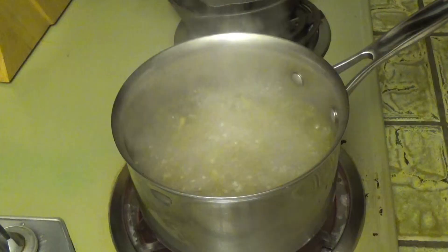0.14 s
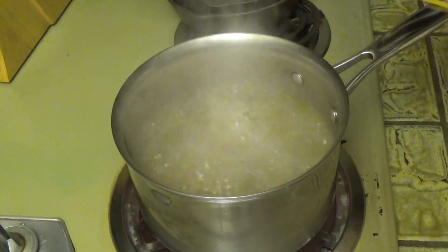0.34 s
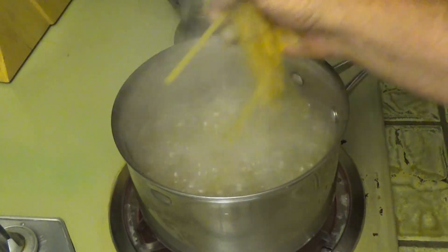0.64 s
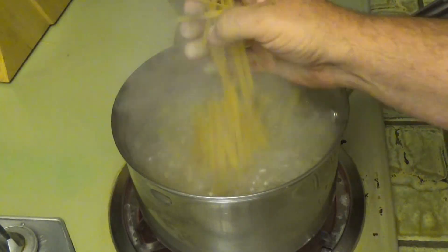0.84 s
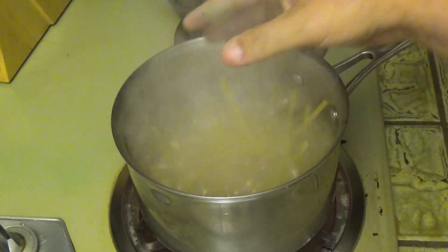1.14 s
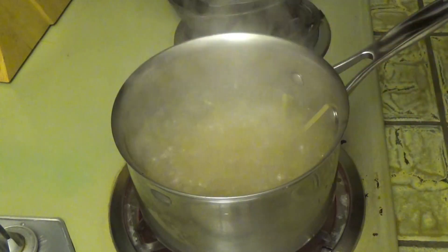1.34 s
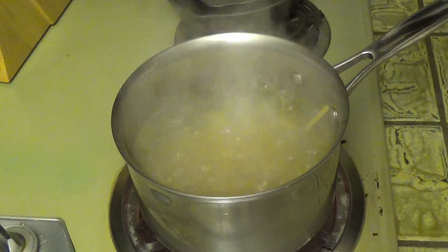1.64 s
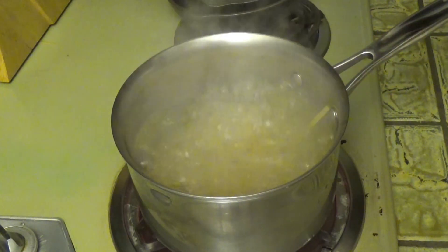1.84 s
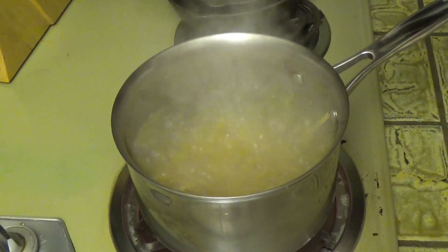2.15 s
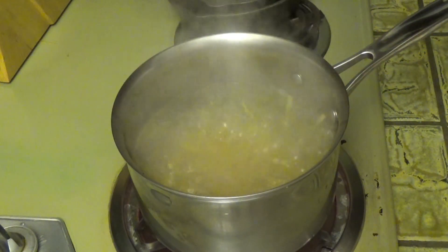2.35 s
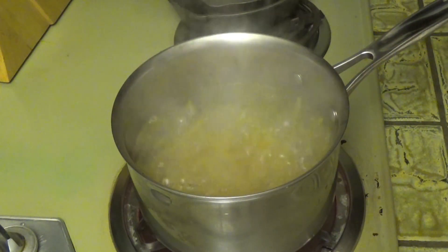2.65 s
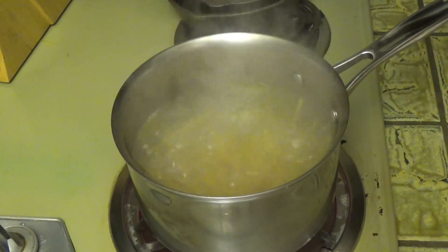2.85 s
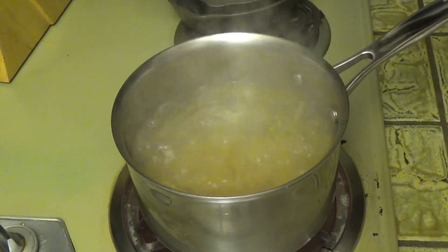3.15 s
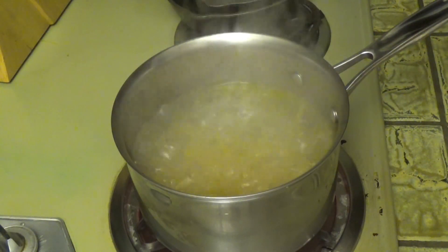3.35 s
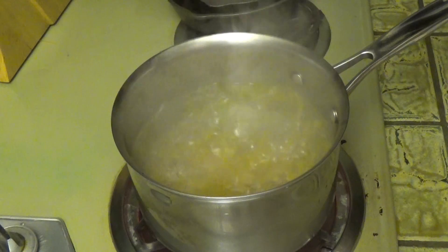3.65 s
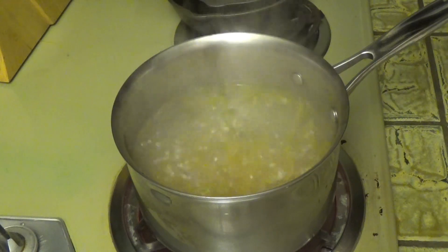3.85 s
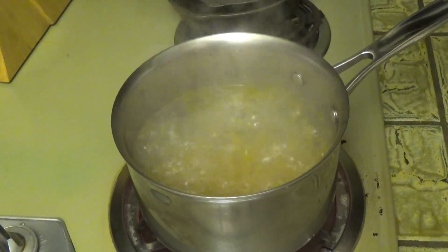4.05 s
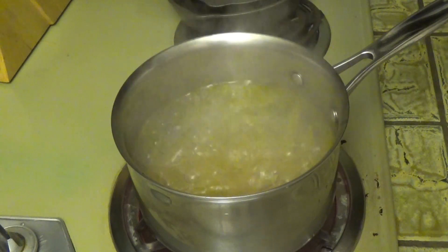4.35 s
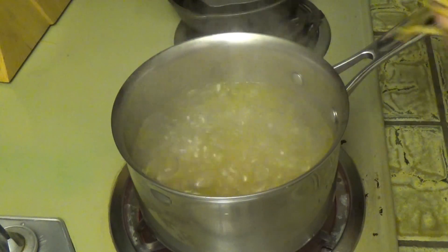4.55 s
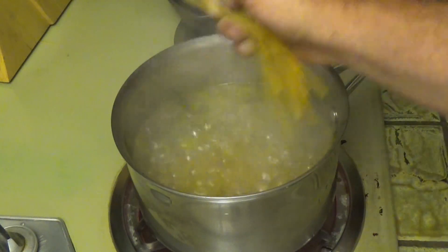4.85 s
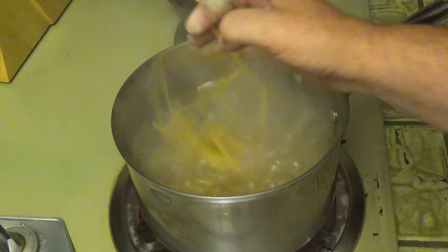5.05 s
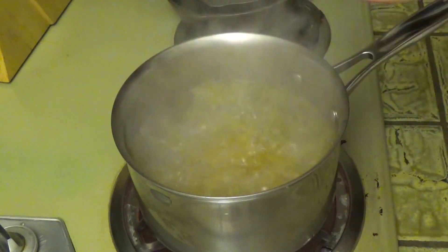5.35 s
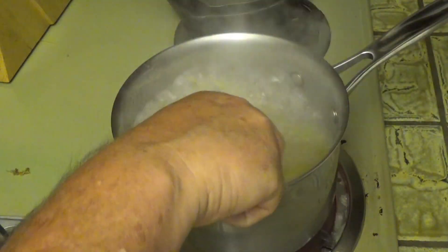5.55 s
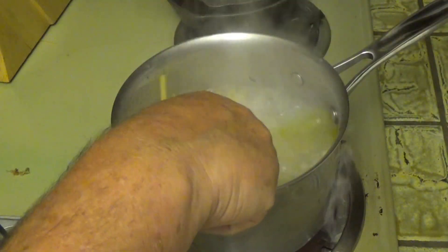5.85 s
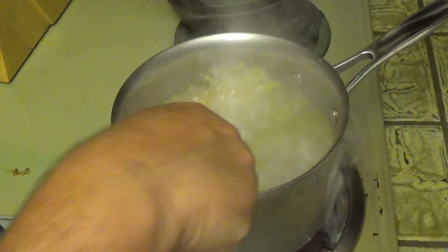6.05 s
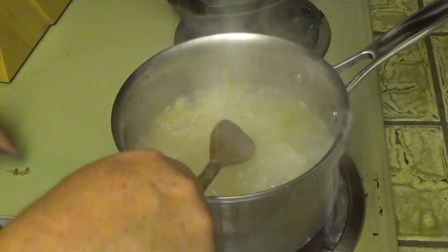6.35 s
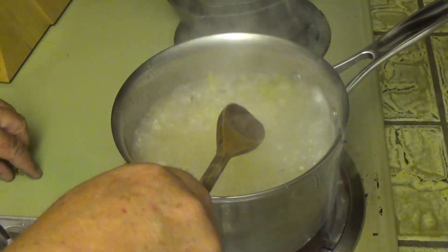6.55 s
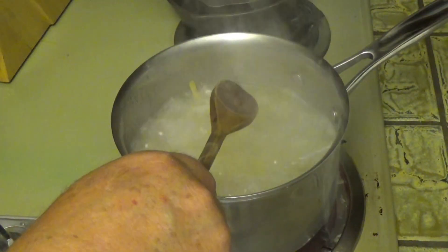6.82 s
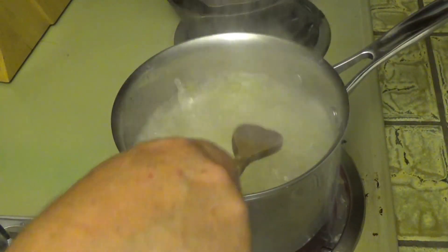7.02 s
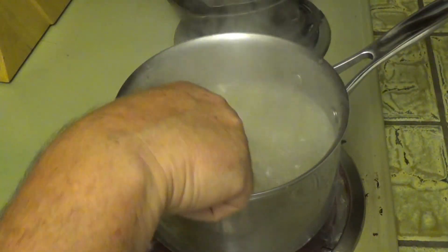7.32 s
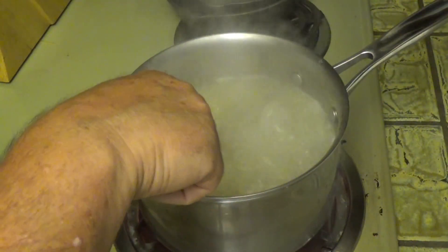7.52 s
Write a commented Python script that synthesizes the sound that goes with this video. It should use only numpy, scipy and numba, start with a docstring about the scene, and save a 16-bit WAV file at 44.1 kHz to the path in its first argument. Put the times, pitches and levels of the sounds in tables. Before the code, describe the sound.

Dry pasta clatters on china and slides into bubbling water, followed by a bright sizzle and a wooden spoon knocking the pot.

```python
"""Pasta into a boiling pot

A close stereo microphone at the hob of a tiled kitchen, where water boils in a steel pot. To the right,
dry pasta is gathered off a plate, rattling on the china, and two handfuls slide into the water.
Then spilt water sizzles on the hot ring while a wooden spoon bumps the pot."""
import sys
import numpy as np
from scipy import signal
from scipy.fft import rfft, irfft
from scipy.io import wavfile
from scipy.ndimage import uniform_filter1d
from numba import njit

SR = 44100
rng = np.random.default_rng(int(sys.argv[2]) if len(sys.argv) > 2 else 0)


def generate_wav(signal):
    """Clip the signal to [-1, 1] and save it as 16-bit WAV at the path in sys.argv[1]."""
    frames = np.transpose(np.atleast_2d(signal))
    scaled = np.clip(frames, -1, 1) * 32767
    pcm = np.round(scaled).astype(np.int16)
    wavfile.write(sys.argv[1], SR, pcm)


N = 338688


def undb(db):
    return 10 ** (np.asarray(db) / 20)


def unit(x):
    return x / np.sqrt(np.mean(x ** 2))


def curve(table, column=1):
    """One column of a table at every sample; the end values are held."""
    rows = np.array(table)
    return np.interp(np.arange(N) / SR, rows[:, 0], rows[:, column])


def colour(x, points):
    """Causal filter that follows (Hz, dB) points; rms 1."""
    hz, db = np.transpose(points)
    log_gain = np.interp(np.log(np.arange(1025) * SR / 2048 + 1), np.log(hz), db) * np.log(10) / 20
    cepstrum = irfft(log_gain)
    cepstrum[1:1024] *= 2  # fold to minimum phase
    cepstrum[1025:] = 0
    return unit(signal.fftconvolve(x, irfft(np.exp(rfft(cepstrum))))[:N])


def band(x, lo_hz, hi_hz):
    sos = signal.butter(2, [lo_hz, min(hi_hz, .45 * SR)], "band", fs=SR, output="sos")
    return signal.sosfilt(sos, x)


def tilt(x, hz, db):
    """Lift or cut what lies below hz."""
    return x + (undb(db) - 1) * signal.lfilter(*signal.butter(2, hz, fs=SR), x)


def ring(x, modes):
    """Damped resonances struck by x."""
    out = 0
    for hz, db, t60 in modes:
        pole = np.exp(2j * np.pi * hz / SR - np.log(1000) / (t60 * SR))
        out = out + undb(db) * signal.lfilter([1], [1, -pole], x).imag
    return out


@njit
def chirps(n, starts, steps, glide, fade, size):
    """Sum of decaying sines whose pitch can climb."""
    out = np.zeros(n)
    for g in range(len(starts)):
        phase, step, amp, i = 0., steps[g], size[g], starts[g]
        while amp > .004 * size[g] and i < n:
            out[i] += amp * np.sin(phase)
            phase += step
            step = min(step * glide[g], 3.)
            amp *= fade[g]
            i += 1
    return out


def grains(rate, lo_hz, hi_hz, cycles, spread_db, rise=0.):
    """Short random pings, rate a second, a few much larger than the rest; rms 1."""
    when, pitch, rank = rng.random((int(rate * N / SR), 3)).T
    starts = (when * N).astype(np.int64)
    hz = lo_hz * (hi_hz / lo_hz) ** pitch
    span = cycles * SR / hz
    size = hz * undb(-spread_db * np.log(1 - .999 * rank))
    return unit(chirps(N, starts, 2 * np.pi * hz / SR, (1 + rise) ** (1 / span), np.exp(-1 / span), size))


def flicker(rate):
    """Random levels held 1 / rate s and smoothed twice; spread near 1."""
    hold = int(SR / rate)
    levels = np.repeat(rng.standard_normal(N // hold + 1), hold)
    return 1.63 * uniform_filter1d(uniform_filter1d(levels, hold), hold)[:N]


def burst(t60, lo_hz, hi_hz):
    """A short decaying puff of noise, peak 1."""
    t = np.arange(int(t60 * SR) + 64) / SR
    x = band(rng.standard_normal(len(t)) * 1000. ** (-t / t60), lo_hz, hi_hz)
    return x / np.abs(x).max()


def bell(t, rise, fall):
    """Lopsided bell curve, 1 at t = 0."""
    return np.exp(-.5 * (t / np.where(t < 0, rise, fall)) ** 2)


def add(out, start, x):
    i = int(start * SR)
    out[..., i:i + x.shape[-1]] += x[..., :N - i]


def pan(x, left_db):
    return x * undb(np.array([[left_db], [-left_db]]) / 2)


# The rolling boil. Each row: time in seconds, gurgle level, rumble lift and fizz level, all in dB.
BOIL_LEVELS = [(0, -47, -10, -38), (.6, -44, -2, -34), (1.4, -44.5, 4, -37), (4.2, -45, 1, -38),
               (5.6, -45.5, 6.5, -37.5), (7.68, -42, 8.5, -34)]
# Tone of the gurgle and of the fizz. Each row: frequency in Hz, relative level in dB.
GURGLE_SPECTRUM = [(20, -44), (85, -20.5), (105, -12), (190, -15), (270, -3.5), (420, -5.5), (500, 1),
                   (650, -5), (800, -0.5), (1050, -2), (1500, -11), (2500, -16)]
FIZZ_SPECTRUM = [(150, -40), (600, -21), (1200, -8), (2200, -6.5), (4100, -3), (7500, -8), (9600, -6.5),
                 (12500, -13), (16000, -26)]
# The steel pot's resonances. Each row: frequency in Hz, gain in dB, seconds to fall 60 dB.
POT_MODES = [(287.8, -8, 0.65), (490, -6.5, 0.1), (831.6, -1.5, 0.15), (1053, 1.5, 0.064),
             (1380, -27, 0.099), (1625, 2, 0.085)]
def boil():
    """Straight ahead, bubbles gurgle through the pot's resonances; small ones fizz at the surface."""
    bubbles = grains(400, 150.7, 2525, cycles=5.46, spread_db=1.5, rise=0.058)
    gurgle = colour(bubbles + undb(8.5) * rng.standard_normal(N), GURGLE_SPECTRUM)
    steel = unit(band(ring(gurgle, POT_MODES), 136, 3900))
    gurgle = tilt(unit(gurgle + undb(-12) * steel), 140, curve(BOIL_LEVELS, column=2))
    beads = grains(700, 6260, 19000, cycles=2, spread_db=3)
    fizz = colour(beads + undb(4.5) * rng.standard_normal(N), FIZZ_SPECTRUM)
    fizz_db = curve(BOIL_LEVELS, column=3) + .6 * flicker(40)
    return undb(curve(BOIL_LEVELS)) * gurgle + undb(fizz_db) * fizz


# The hand sweeping through the pasta. Each row: start in seconds, level in dB,
# hold and release in seconds, lift of the duller contacts in dB.
HAND_SWEEPS = [(0.289, -24.5, .02, 0.065, 1), (0.383, -28.5, 0.043, 0.13, 3),
               (1.76, -17.5, 0.092, 0.26, -0.4), (2.152, -22.5, 0.023, 0.054, -4),
               (2.191, -17, 0.054, 0.15, -2.5), (2.453, -20.5, 0.041, 0.041, 1),
               (2.512, -18, 0.035, 0.27, -.6), (2.74, -26, 0.014, 0.2, 0.7),
               (2.872, -28.5, 0.1, 0.084, -3.5), (2.966, -24, 0.029, 0.33, -3.5),
               (3.175, -19, 0.032, 0.11, -1), (3.293, -18.5, 0.075, 0.082, -0.5),
               (3.458, -21.5, 0.049, 0.16, 1), (3.591, -19.5, 0.12, 0.25, 1.6),
               (3.966, -27.5, 0.029, .05, 1), (4.02, -24.5, 0.038, 0.13, 3.2),
               (4.305, -36.5, .01, 0.11, 3.5), (4.385, -27.5, .01, 0.11, 0), (4.453, -27.5, 0.015, 0.07, 1)]
def hand_sweeps(attack_s=0.036, taper=0.89):
    """Strength and dullness of sweeps that swell, hold and settle; the loudest sets the colour."""
    t, power, dull = np.arange(N) / SR, 1e-12, 0
    for start, db, hold, release, dull_db in HAND_SWEEPS:
        swell = np.clip((t - start) / attack_s, 0, 1)
        settle = np.clip(1 - (t - start - attack_s - hold) / release, 0, 1)
        sweep_power = (undb(db) * swell ** 2 * settle ** taper) ** 2
        power += sweep_power
        dull += sweep_power * dull_db
    return np.sqrt(power), dull / power


# Tone of dry pasta on china. Each row: frequency in Hz, relative level in dB.
PLATE_SPECTRUM = [(40, -47), (300, -27), (800, -18.5), (1100, -11), (1700, -1.5), (2900, 1.5), (4000, -2.5),
                  (6000, -6.5), (10000, -12), (13000, -23), (16000, -37)]
# The plate's resonances. Each row: frequency in Hz, gain in dB, seconds to fall 60 dB.
PLATE_MODES = [(1240, 8, 0.18), (1738, 10, 0.22), (2196, 9, 0.045), (2366, -9, 0.042), (2744, 11, 0.053),
               (3025, 13, 0.067), (3470, 4, 0.074), (4030, -22, 0.087)]
# A bunch of sticks slapping the china at once. Each row: start in seconds, peak level in dB.
CLACKS = [(0.3188, -6), (0.3995, -9.5), (0.413, -9), (0.471, -9), (2.1685, -10), (2.4863, -7),
          (2.7756, -9.5), (2.8389, -13), (3.4055, -12), (3.4663, -8), (3.9624, -19), (4.0284, -7),
          (4.0624, -8), (4.143, -9.5), (4.214, -15), (4.3256, -15.5), (4.3975, -7.5)]
def plate_rattle():
    """Right of the microphone, hundreds of hard sticks knock together in clumps and ring the china."""
    clicks = unit(grains(6000, 293, 19100, cycles=11, spread_db=1) + undb(3.5) * rng.standard_normal(N))
    snaps = grains(250, 1070, 13500, cycles=6, spread_db=3)  # lone sticks flicking free
    clicks = (clicks + undb(-9.5) * snaps) * undb(1.04 * flicker(90))
    strength, dull_db = hand_sweeps()
    clicks = tilt(clicks, 4700, dull_db + 0.39 * flicker(14))  # contacts shift from dull to bright
    china = unit(band(ring(clicks, PLATE_MODES), 640, 9100))
    out = strength * unit(colour(clicks, PLATE_SPECTRUM) + undb(-16) * china)
    for start, db in CLACKS:
        clack = colour(burst(0.069, 1440, 19000), PLATE_SPECTRUM)
        clack += undb(-8.5) * unit(band(ring(clack, PLATE_MODES), 2200, 11000))
        add(out, start, undb(db) * clack / np.abs(clack).max())
    return out


# Spits at the hob. Each row: start in seconds, peak level in dB, pitch in Hz.
SPITS = [(0.5499, -29, 8300), (0.7701, -22, 9550), (0.7997, -14, 9570), (0.893, -12, 10200),
         (0.9492, -15, 5460), (2.051, -34.5, 6840), (2.1186, -12, 7795), (4.5788, -27, 9570),
         (4.62, -25, 9200), (4.8603, -18, 9500), (4.9294, -31, 5490), (5.1044, -11.5, 9450),
         (5.1482, -14, 8900), (5.23, -18, 5300), (5.2734, -23, 9820), (5.3827, -31.5, 9320),
         (5.456, -15, 5150), (5.5175, -29, 5580), (7.3826, -17, 12200)]
def spits():
    """Thin, high spits, each an instant of narrow treble noise."""
    out = np.zeros(N)
    for start, db, hz in SPITS:
        add(out, start, undb(db) * burst(0.01, hz / 1.02, hz * 1.09))
    return out


# Taps on the pot. Each row: start in seconds, level in dB, pitch in Hz, relative treble in dB.
STEEL_TICKS = [(0.8837, -20, 1680, 6), (0.9447, -18, 2840, -11), (1.1723, -28.5, 1560, 10),
               (1.2192, -25.5, 4100, 6), (1.2282, -31, 3770, 9), (5.025, -27.5, 2830, 15),
               (5.066, -24, 3720, -6), (5.1053, -26, 2800, -7), (5.145, -26, 1660, -1),
               (5.2005, -23.5, 2750, -8), (5.227, -22, 3560, 9), (5.425, -28.5, 4040, -13),
               (5.4566, -21.5, 2510, 10), (5.467, -21.5, 4230, -9), (5.655, -24, 3200, 10),
               (6.957, -17, 2950, -19), (7.1058, -30, 1590, -6), (7.1456, -23, 4200, -7),
               (7.537, -27.5, 3100, -7.5)]
def steel_ticks(t60=0.071):
    """Single sticks and the spoon tick on the steel, ringing briefly under a bright crack."""
    out = np.zeros(N)
    for start, db, hz, treble_db in STEEL_TICKS:
        note = burst(t60, hz / 1.09, hz * 1.06)
        body = burst(t60, hz / 2.1, hz * 2.3)
        add(out, start, undb(db) * (note + undb(3.5) * body))
        add(out, start, undb(db + treble_db) * burst(0.42 * t60, 7000, 13000))
    return out


# Bumps and plops. Each row: start in seconds, level in dB, starting pitch in Hz.
POT_BUMPS = [(0.943, -20.5, 1040), (1.017, -24, 850), (1.054, -27, 1390), (1.102, -32.5, 1010),
             (2.273, -27, 776), (2.651, -28, 790), (5.071, -29, 1010), (5.159, -24.5, 1050),
             (5.626, -25, 863), (6.053, -31.5, 830), (6.845, -36, 785), (6.984, -31, 1050),
             (7.024, -33, 950), (7.106, -32, 846), (7.183, -23, 1050), (7.359, -27, 1060),
             (7.371, -25.5, 900), (7.459, -33, 826), (7.523, -35, 785), (7.546, -29.5, 860),
             (7.601, -22.5, 740)]
def pot_bumps():
    """Dull bumps and large bursting bubbles set the pot ringing."""
    blows, t = np.zeros(N), np.arange(SR // 10) / SR
    envelope = 1000. ** (-t / 0.041) * (1 - np.exp(-t / 0.00084))
    for start, db, hz in POT_BUMPS:
        note = np.sin(2 * np.pi * hz * t * (1 + 3.3 * t))  # climbs as the bubble nears the surface
        splash = undb(-3.5) * unit(band(rng.standard_normal(len(t)), hz / 1.88, hz * 1.77))
        add(blows, start, undb(db) * envelope * (note + splash))
    return band(blows + undb(-41.5) * ring(blows, POT_MODES), 200, 4000)


# Tone of sliding pasta. Each row: frequency in Hz, relative level in dB.
RUSTLE_SPECTRUM = [(200, -62), (1000, -14), (2300, -6.5), (3500, 1), (7000, 0), (10000, 1.5), (13000, -4),
                   (16000, -18)]
# Two handfuls let go over the pot, the second led by a few loose sticks. Each row: landing time in
# seconds, level in dB, relative splash in dB, seconds of slide before, seconds of stragglers after.
HANDFULS = [(0.954, -24.5, -6, 0.11, 0.28), (4.93, -42, -20, 0.046, .03), (5.155, -24.5, -8, 0.11, 0.11)]
def pasta_drops(stop_s=0.022, straggle_db=-15.5):
    """Sticks rustle past the fingers ever thicker until the bulk splashes in; stragglers follow."""
    sticks = grains(6000, 674, 19100, cycles=3.9, spread_db=3.5) + undb(-1.5) * rng.standard_normal(N)
    rustle = colour(sticks, RUSTLE_SPECTRUM) * undb(1.04 * flicker(80))
    splash = unit(band(grains(1500, 754, 2936, cycles=8.8, spread_db=3.5, rise=0.039), 550, 1950))
    out = 0
    for landing, db, splash_db, slide, straggle in HANDFULS:
        t = np.arange(N) / SR - landing
        held = np.minimum(t, 0) + np.maximum(t - straggle, 0)  # stays at 0 while stragglers fall
        stragglers = undb(straggle_db) * bell(held, slide, stop_s)
        falling = bell(t, slide, stop_s) + stragglers
        wet = undb(splash_db) * (bell(t, rise=0.068, fall=0.045) + stragglers)
        out += undb(db) * (falling * rustle + wet * splash)
    return out


# Spilt water on the hot ring. Each row: time in seconds, level in dB before the low hiss is lifted.
SIZZLE_LEVELS = [(5.654, -20.5), (5.9, -21), (6.15, -21), (6.366, -26), (6.6, -27.5), (6.93, -31.5),
                 (7.2, -29), (7.668, -34)]
# Tone of the steam. Each row: frequency in Hz, relative level in dB.
STEAM_SPECTRUM = [(100, -42), (600, -24.5), (1500, -19), (2600, -16), (4000, -9.5), (7500, -2.5),
                  (10500, 2.5), (13000, -5), (16000, -15)]
def sizzle(low_hiss_db=5):
    """Tiny droplets flash to steam on the ring: a dense bright crackle over a smoother hiss."""
    pops = grains(7000, 578, 20150, cycles=7.1, spread_db=2.5) + undb(4) * rng.standard_normal(N)
    pops += undb(-14) * grains(500, 3600, 15600, cycles=1.6, spread_db=5)  # larger droplets crack
    spilt = np.arange(N) / SR > SIZZLE_LEVELS[0][0]
    steam = colour(pops, STEAM_SPECTRUM) * undb(0.94 * flicker(60)) * spilt
    return undb(curve(SIZZLE_LEVELS)) * tilt(steam, 5150, low_hiss_db)


def kitchen(dry, t60=0.5, wet_db=-11, dull_hz=10000):
    """Tiled walls return a short diffuse tail, different at each capsule."""
    t = np.arange(SR // 2) / SR
    tails = rng.standard_normal((2, len(t))) * 1000. ** (-t / t60) * (t > .002)
    tails = [band(x, 360, dull_hz) / np.sqrt(np.sum(x ** 2)) for x in tails]
    return dry + undb(wet_db) * np.array([signal.fftconvolve(dry.mean(axis=0), x)[:N] for x in tails])


def scene():
    """Facing the hob: pot and ring near the centre, the plate to the right."""
    return kitchen(pan(boil(), 0.32) + pan(plate_rattle(), -2.5)
                   + pan(spits() + steel_ticks() + pot_bumps(), 0.43)
                   + pan(pasta_drops(), .1) + pan(sizzle(), -0.23))


def record(dry, ceiling=0.84, top_hz=15900):
    """A close stereo microphone, deep bass in the centre; peaks are rounded and the very top is cut."""
    mid = (dry[0] + dry[1]) / 2
    side = undb(1) * band((dry[0] - dry[1]) / 2, 150, 13500)
    rounded = ceiling * np.tanh(np.array([mid + side, mid - side]) / ceiling)
    return signal.sosfilt(signal.ellip(10, .2, 80, top_hz, fs=SR, output="sos"), rounded)


dry = scene()
out = record(dry)
generate_wav(out)
```